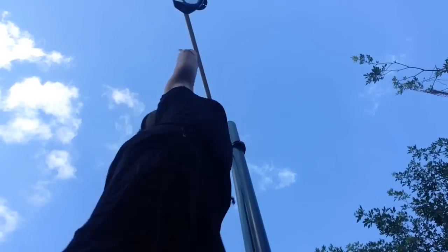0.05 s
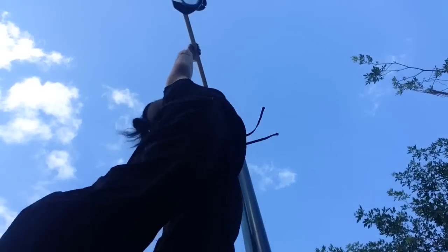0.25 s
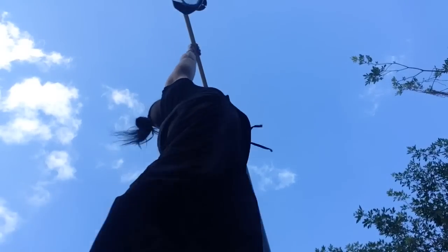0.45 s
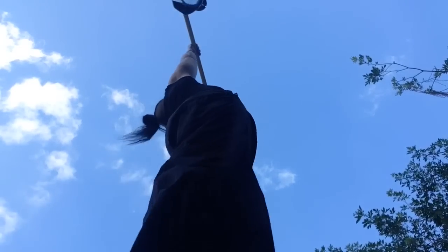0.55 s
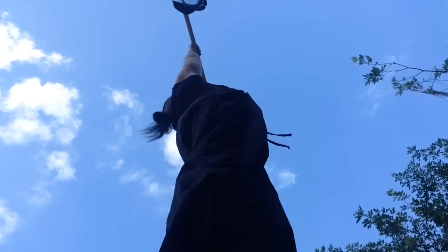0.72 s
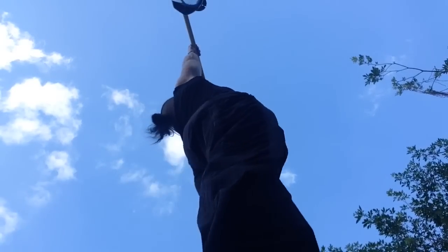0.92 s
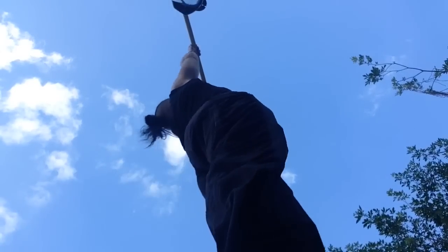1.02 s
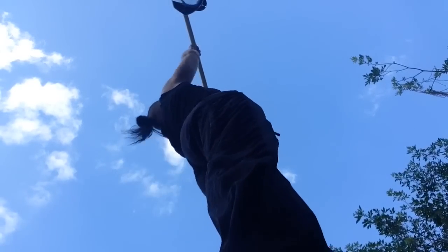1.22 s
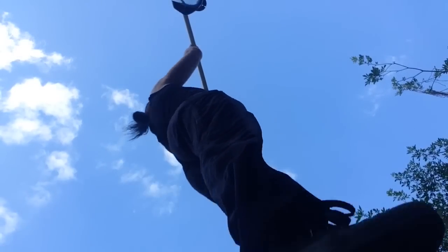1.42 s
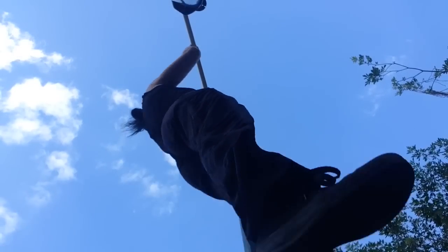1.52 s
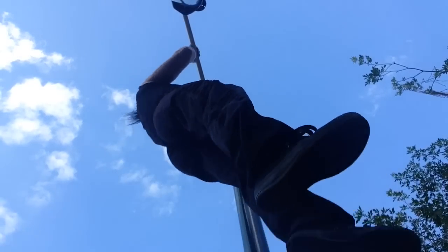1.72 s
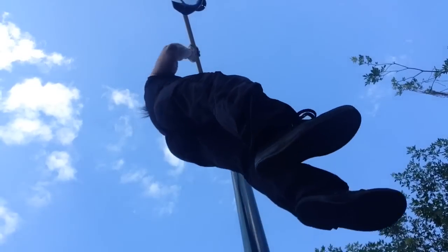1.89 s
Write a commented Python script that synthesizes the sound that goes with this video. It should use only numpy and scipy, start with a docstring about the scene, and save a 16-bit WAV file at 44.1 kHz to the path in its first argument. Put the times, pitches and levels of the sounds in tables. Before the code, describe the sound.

A metal pull-up bar clanks twice outdoors, with rustling clothes and a faint rumble.

```python
"""Outdoors, at a steel pull-up bar, someone swings up. Clothes rustle and the grip creaks,
then the bar shifts in its loose brackets and clanks twice. Each blow sets the steel ringing:
the frame only briefly, while the bar itself sings on faintly. Trees and ground give a soft echo.
Behind it all lie a low distant rumble and a far bird."""
import sys
import numpy as np
from scipy import signal
from scipy.fft import rfft, irfft
from scipy.io import wavfile

SR = 44100
rng = np.random.default_rng(int(sys.argv[2]) if len(sys.argv) > 2 else 0)


def bounce(signal):
    """Save signal as a 16-bit WAV file at the path given by the first command-line argument."""
    frames = np.transpose(np.atleast_2d(signal))
    limited = np.clip(frames, -1, 1)
    pcm = np.round(limited * 32767).astype(np.int16)
    wavfile.write(sys.argv[1], SR, pcm)


N = 85995
T = np.arange(N) / SR


def from_db(db):
    """Turn decibels into a gain to multiply by."""
    return 10 ** (np.asarray(db) / 20)


def seconds(length_s):
    """The time axis of a short sound."""
    return np.arange(int(length_s * SR)) / SR


def frequencies(size):
    """The frequency of each slot in a spectrum, at least 1 Hz."""
    return np.maximum(np.fft.rfftfreq(size, 1 / SR), 1)


def add(out, start_s, sound):
    """Mix a short sound in at its start time."""
    start = max(int(start_s * SR), 0)
    out[start:start + len(sound)] += sound[:N - start]


def at_hz(points, hz):
    """Read between rows of (pitch_hz, value), with octaves evenly spaced."""
    pitch_hz, value = np.transpose(points)
    return np.interp(np.log(hz), np.log(pitch_hz), value)


def level_curve(points):
    """Gain over time from rows of (time_s, level_db)."""
    return from_db(np.interp(T, *np.transpose(points)))


def noise(spectrum, size=N):
    """Noise shaped by rows of (pitch_hz, db_per_octave)."""
    hz = frequencies(size)
    gain = from_db(at_hz(spectrum, hz)) * np.sqrt(SR / (2 * np.log(2) * hz)) * (hz > 27)
    return irfft(rfft(rng.standard_normal(size)) * gain, size)


def noise_band(centre_hz, octaves, size):
    """Noise gathered around one pitch, with a typical size (rms) of 1."""
    hz = frequencies(size)
    hump = 1 / (1 + (np.log2(hz / centre_hz) / octaves) ** 2)
    band = irfft(rfft(rng.standard_normal(size)) * hump / np.sqrt(hz + centre_hz), size)
    return band / band.std()


def struck(t, rise_s, fade_s):
    """The loudness of a blow: a quick rise, then a fall of 60 dB every fade_s."""
    return np.clip(t / rise_s, 0, 1) * np.exp(-np.log(1000) * np.maximum(t - rise_s, 0) / fade_s)


def ring(hz, rise_s, fade_s):
    """One pure tone of a struck object, dying away."""
    t = seconds(fade_s)
    return np.sin(2 * np.pi * hz * t) * struck(t, rise_s, fade_s)


def clothes():
    """Cloth swishes during the swing and settles once the body hangs."""
    # tone of rubbing cloth: pitch_hz, db_per_octave
    cloth = [(100, -59.5), (400, -60), (900, -62), (2000, -67.5), (4500, -63.5), (9000, -65), (14000, -64)]
    # swell and fade of the swish: time_s, level_db
    swish = [(0, -2.5), (.1, 3), (.18, 0), (.3, -4), (.38, -10.5), (.5, -13), (.7, -29)]
    return noise(cloth) * level_curve(swish)


def distant_rumble(hiss_above_hz=2500):
    """A steady low rumble whose hiss swells a little."""
    # tone of the background: pitch_hz, db_per_octave
    rumble = [(22, -84.5), (40, -65.5), (65, -53.5), (110, -51), (190, -57.5), (300, -56), (450, -65),
              (800, -65.5), (1300, -73.5), (2500, -79), (4500, -80.5), (9000, -82), (14500, -82)]
    # change in the treble: time_s, level_db
    hiss_level = [(0, 0), (1.2, -1), (1.6, 2), (1.75, 0.5), (1.95, 2.5)]
    air = noise(rumble)
    hiss = irfft(rfft(air) / (1 + (hiss_above_hz / frequencies(N)) ** 2), N)
    return air + hiss * (level_curve(hiss_level) - 1)


def grip():
    """Ticks, rubs and soft bumps as the weight comes onto the bar."""
    # dry ticks of grip and fittings: start_s, level_db, pitch_hz, decay_s
    ticks = [(0.0258, -37.5, 7758, 0.0005), (.0437, -40, 3850, .0008), (0.051, -28.5, 3590, 0.00047),
             (.0555, -32, 2940, 0.00099), (.0587, -35.5, 2900, 0.0011), (.065, -39, 3110, .001),
             (0.4662, -48.5, 3448, 0.0011), (.577, -68, 13000, .001), (1.625, -70.5, 12000, .008)]
    # sleeves, hands and the bar rubbing: start_s, rise_s, fade_s, level_db, pitch_hz, width_octaves
    rubs = [(0.037, .021, .06, -50, 3177, .45), (.097, 0.018, .09, -40.5, 650, 0.87),
            (.098, 0.014, .12, -49.5, 7000, 1.2), (0.2004, .002, .09, -34, 397.6, .4),
            (0.2001, .002, .2, -43.5, 2500, .6), (.216, 0.0033, .06, -30, 2750, .2)]
    # soft knocks and thuds; the low thud falling in pitch near 0.12 s is a sleeve swishing past: start_s,
    # pitch_hz, level_db, fade_s
    bumps = [(0.0702, 590, -30, 0.013), (.113, 418, -33, 0.027), (.122, 290, -29.5, 0.018),
             (.124, 115, -27.5, .06), (.201, 500, -34, 0.066), (.207, 400, -33, .05)]
    out, t = np.zeros(N), seconds(.2)
    for start_s, db, hz, decay_s in ticks:
        add(out, start_s, from_db(db) * noise_band(hz, octaves=.44, size=len(t)) * np.exp(-t / decay_s))
    for start_s, rise_s, fade_s, db, hz, octaves in rubs:
        add(out, start_s, from_db(db) * noise_band(hz, octaves, len(t)) * struck(t, rise_s, fade_s))
    for start_s, hz, db, fade_s in bumps:
        add(out, start_s, from_db(db) * ring(hz, rise_s=.0015, fade_s=fade_s))
    return out


def bass_lag(hz, longest_s=.0036, bass_hz=600):
    """Low tones start late, because the heavy posts take longer to get going."""
    return longest_s / (1 + (hz / bass_hz) ** 2)


def clusters(hz, depth_db=2, spacing_hz=90):
    """Weak tones bunch together: random peaks and dips, mostly in the treble, at equal total power."""
    grid_hz = np.arange(0, SR / 2, spacing_hz)
    ripple = np.interp(hz, grid_hz, rng.standard_normal(len(grid_hz)))
    gain = from_db(depth_db * ripple * np.minimum(hz / 5000, 1))
    return gain / np.sqrt(np.mean(gain ** 2))


def clatter(blow, rise_s, ring_share):
    """A hard crack of contact, then tones too dense to tell apart; each band dies at its own rate."""
    # weak tones of posts and brackets: pitch_hz, free_fade_s, first_db_per_octave, second_db_per_octave
    weak_tones = [(50, 0.18, -56.5, -55), (120, .16, -33.5, -32.5), (210, 0.17, -28.5, -34.5),
                  (370.5, .11, -23, -22), (600.2, .12, -28.5, -26), (950, .2, -34.5, -30),
                  (1405, .16, -21, -28), (2300, 0.26, -27.5, -23), (3300, .16, -18.5, -24.5),
                  (4531, .15, -19, -25.5), (6000, .15, -32.5, -31.5), (8700, 0.17, -36, -36.5),
                  (11300, .13, -33.5, -29.5), (15000, .11, -39.5, -41)]
    table, t = np.array(weak_tones), seconds(.5)
    hz, out = frequencies(len(t)), np.zeros(len(t))
    crowd = rfft(noise(table[:, [0, 2 + blow]], len(t))) * clusters(hz)
    edges_hz = np.geomspace(31, 16000, 19)   # half an octave apart
    for low, high in zip(edges_hz, edges_hz[1:]):
        centre_hz = np.sqrt(low * high)
        age = t - bass_lag(centre_hz)
        crack = from_db(-.5) * struck(age, rise_s, fade_s=.017)
        ringing = struck(age, rise_s, ring_share * at_hz(table[:, :2], centre_hz))
        band = irfft(crowd * ((hz >= low) & (hz < high)), len(t))
        out += band * (crack + ringing)
    return out


def clanks(twin_gap_hz=8, twin_db=-9):
    """The bar hits its bracket twice, on different spots, so the same tones ring in a different mix."""
    # the blows: start_s, rise_s, clatter_db, ring_db, ring_share
    # (ring_share is the part of the frame's free fade time left while the bar presses on it)
    blows = [(0.2222, .0025, 1.5, 0, 0.92), (0.2958, 0.00392, -1, -0.5, 0.76)]
    # short tones of the frame: pitch_hz, free_fade_s, first_clank_db, second_clank_db
    frame_tones = [(113, .2, -26, -25), (170, .08, -22, -29), (262, .08, -22, -32), (325, .08, -21, -21),
                   (378, .08, -17, -18), (427, .15, -20, -22), (618, .14, -30, -25), (1178, .13, -23, -28),
                   (1395, .12, -23, -26), (1452, .11, -24, -23), (1636, .13, -21, -31),
                   (1915, .11, -28, -33), (2090, .1, -31, -21), (2335, .2, -28, -30), (2487, .14, -26, -28),
                   (2784, .11, -21, -34), (2858, .12, -19, -37), (3060, .12, -22, -36),
                   (3261, .13, -27, -28), (3320, .1, -34, -26), (3440, .1, -25, -28), (3552, .1, -16, -28),
                   (3720, .11, -21, -27), (3880, .1, -25, -27), (4040, .1, -24, -36), (4211, .13, -22, -34),
                   (4536, .11, -21, -34), (4764, .08, -27, -38), (5330, .1, -35, -32),
                   (6982, .11, -35, -41), (7364, .11, -41, -44), (8543, .07, -40, -44),
                   (9620, .1, -52, -39), (10700, .09, -39, -38), (11800, .09, -37, -40),
                   (12350, .1, -41, -46)]
    # long tones of the bar: pitch_hz, fade_s, first_clank_db, second_clank_db
    bar_tones = [(813, 1.6, -60.5, -49.5), (849, .36, -38.5, -41), (870.5, 1.1, -54.5, -43),
                 (1303, .42, -55, -45.5), (1331, 0.64, -54, -43.5), (2199, 1.2, -57, -55),
                 (2223.5, .95, -58, -53), (2277, .33, -40.5, -39.5), (2332, 0.85, -55.5, -55.5),
                 (2649, .6, -59.5, -60), (4231, .33, -51.5, -47.5), (4210, .25, -46.5, -39.5)]
    out = np.zeros(N)
    for blow, (start_s, rise_s, clatter_db, ring_db, ring_share) in enumerate(blows):
        add(out, start_s, from_db(clatter_db) * clatter(blow, rise_s, ring_share))
        for hz, free_fade_s, *db in frame_tones:
            onset_s = start_s + bass_lag(hz) + rise_s * rng.random() / 2
            add(out, onset_s, from_db(ring_db + db[blow]) * ring(hz, rise_s, free_fade_s * ring_share))
        for hz, fade_s, *db in bar_tones:
            onset_s = start_s + bass_lag(hz) + rise_s * rng.random() / 2
            # the bar bends in two directions at slightly different pitches, so its tone throbs
            twin = from_db(twin_db) * ring(hz + twin_gap_hz, rise_s, fade_s)
            add(out, onset_s, from_db(ring_db + db[blow]) * (ring(hz, rise_s, fade_s) + twin))
    return out


def echo(sound):
    """Trees and ground scatter a faint, blurred copy of the sound back."""
    # tone of the echo: pitch_hz, level_db
    echo_tone = [(200, -42.5), (900, -37.5), (2500, -40), (4500, -35), (9000, -45.5), (15000, -47)]
    t = seconds(.5)
    tail = rng.standard_normal(len(t)) * struck(t, rise_s=.02, fade_s=.7)
    tail /= np.sqrt(np.sum(tail ** 2))
    colour = from_db(at_hz(echo_tone, frequencies(len(t))))
    return signal.fftconvolve(sound, irfft(rfft(tail) * colour, len(t)))[:N]


def bird(waver_hz=70):
    """A far bird gives thin whistles that glide and waver in pitch."""
    # the whistles: start_s, length_s, start_hz, end_hz, level_db
    whistles = [(1.481, .17, 6206, 5528, -77.5), (1.48, .11, 5570, 5350, -82),
                (1.78, 0.141, 3900, 3970, -81.5), (1.882, 0.093, 6350, 6450, -71.5)]
    out, t = np.zeros(N), seconds(.5)
    for start_s, length_s, start_hz, end_hz, db in whistles:
        progress = np.clip(t / length_s, 0, 1)
        waver = waver_hz * noise_band(centre_hz=60, octaves=.876, size=len(t))
        hz = start_hz + (end_hz - start_hz) * progress + waver
        tone = np.sin(2 * np.pi * np.cumsum(hz) / SR)
        add(out, start_s, from_db(db) * np.sin(np.pi * progress) * tone)
    return out


def scene():
    """The person and the bar close by, with the bird and the rumble far behind."""
    near = clanks() + grip() + clothes()
    return (near + echo(near) + bird() + distant_rumble())[None]


def record(dry, cutoff_hz=15900):
    """Round off the loudest peaks and cut the highest treble."""
    low_pass = signal.cheby2(14, 60, cutoff_hz, fs=SR, output="sos")
    return signal.sosfilt(low_pass, np.tanh(dry))


dry = scene()
out = record(dry)
bounce(out)
```